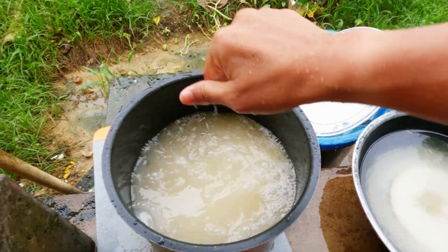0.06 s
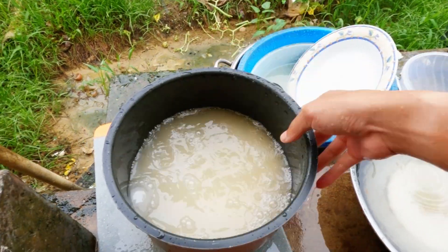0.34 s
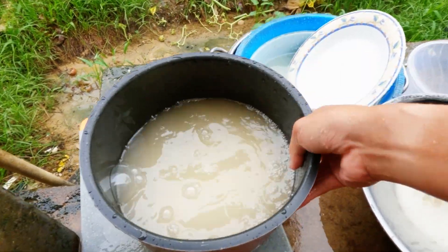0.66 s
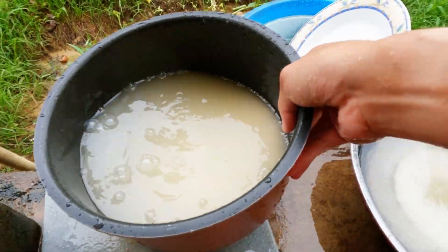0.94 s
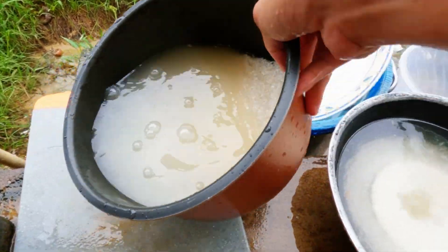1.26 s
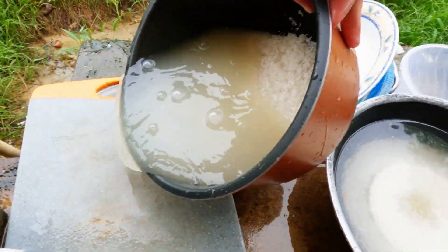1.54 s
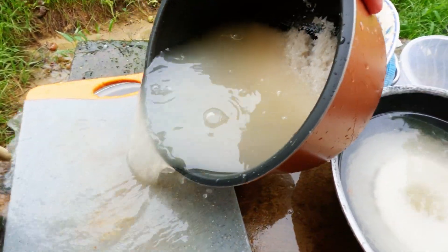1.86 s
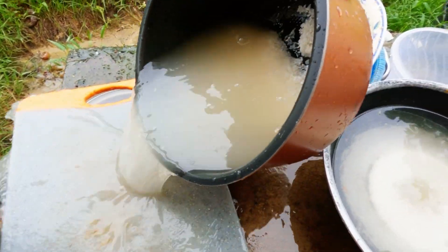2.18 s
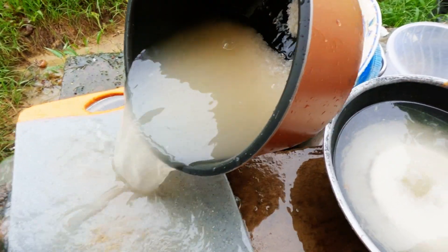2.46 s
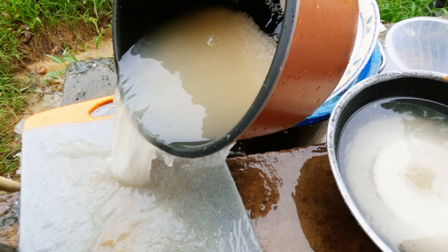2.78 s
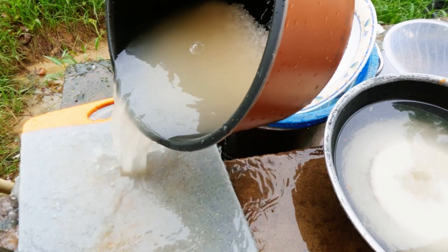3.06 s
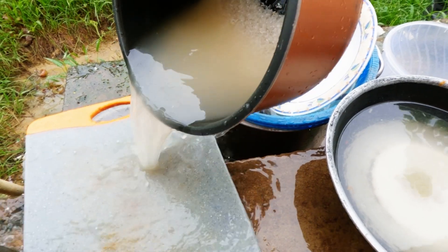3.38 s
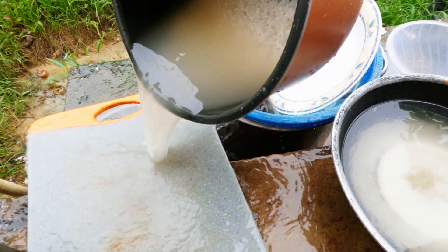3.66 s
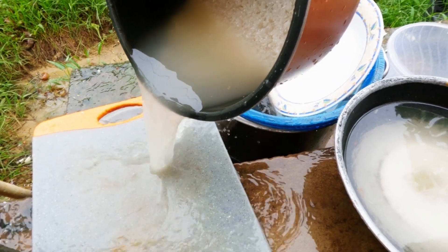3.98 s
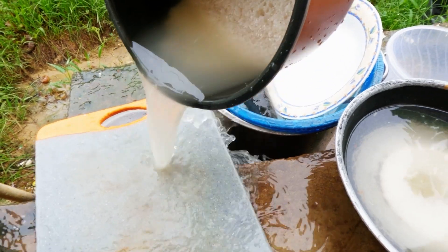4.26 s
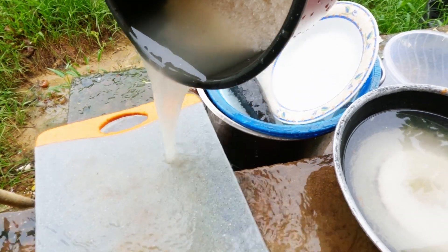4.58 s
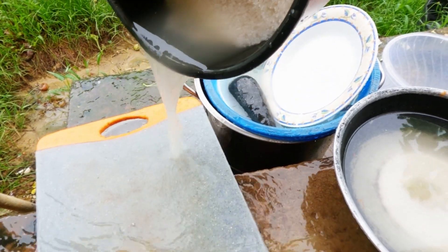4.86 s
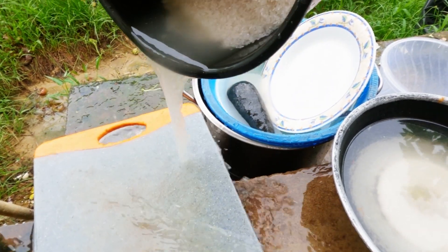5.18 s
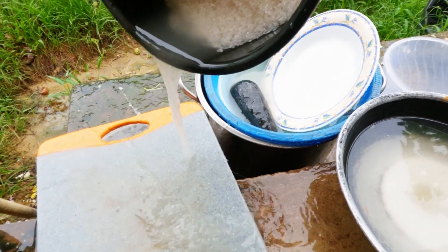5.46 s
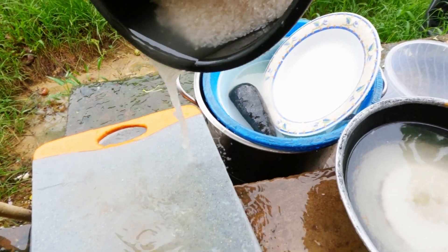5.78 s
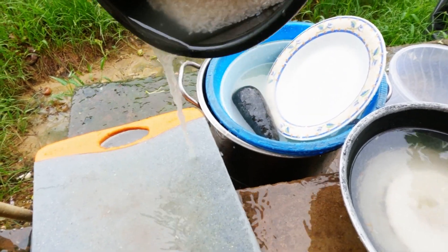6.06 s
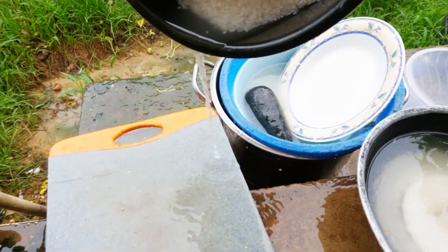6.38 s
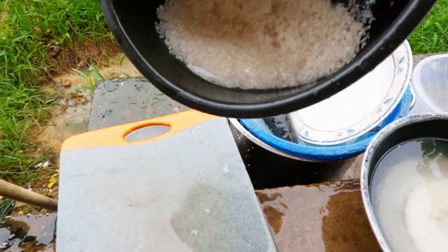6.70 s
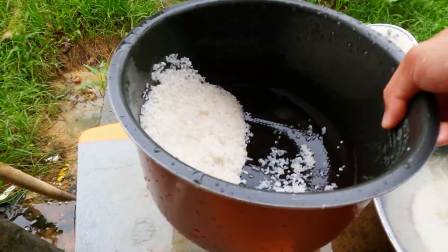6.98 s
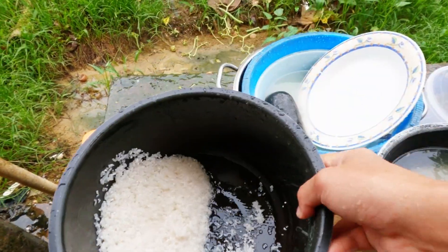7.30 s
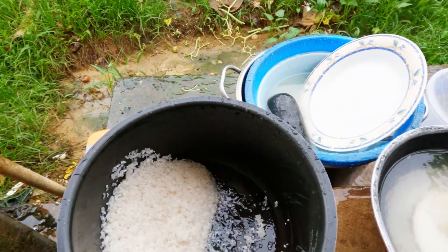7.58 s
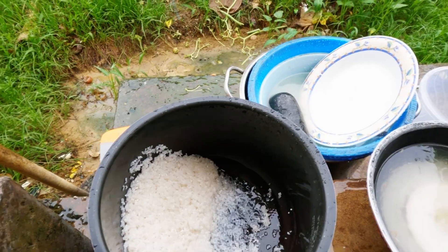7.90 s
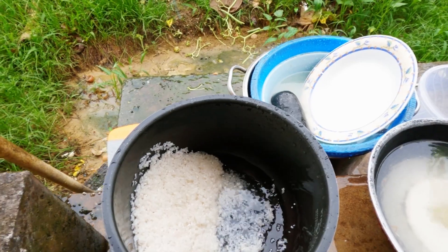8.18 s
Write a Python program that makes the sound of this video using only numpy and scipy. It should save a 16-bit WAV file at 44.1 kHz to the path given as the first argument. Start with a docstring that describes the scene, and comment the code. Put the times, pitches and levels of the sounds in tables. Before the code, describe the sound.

Foam fizzes softly in a pot of rinsed rice, followed by a light tap and a brief breathy rush. Water then pours from the pot and splatters on a plastic board, gurgling into a puddle. The stream thins to a trickle with plinking drops, and the pot is set down with a short ringing knock. The water is close, in a garden with faint trilling insects and a breeze bumping the microphone.

```python
"""Foam fizzes softly in a pot of rinsed rice, while garden insects trill and a breeze bumps the microphone.
The pot taps a plastic board, and a soft breathy rush swells and ends in faint clicks and puffs.
Water sloshes from the tilted pot, splatters on the board, thins to a trickle and plinks into a basin:
each plink is a trapped air bubble ringing. Then the pot is set down with a knock and rings briefly."""
import sys
import numpy as np
from scipy import signal
from scipy.fft import rfft, irfft, next_fast_len
from scipy.io import wavfile
from scipy.ndimage import uniform_filter1d, map_coordinates

SR = 44100
rng = np.random.default_rng(int(sys.argv[2]) if len(sys.argv) > 2 else 0)


def int16_out(signal):
    """Quantize to a 16-bit WAV file."""
    q = np.round(np.clip(np.atleast_2d(signal).T, -1, 1) * 32767)
    wavfile.write(sys.argv[1], SR, q.astype(np.int16))


N = 372204

# water running over the rim: time_s, flow (1 = a full pour)
WATER_FLOW = [(1.8, .04), (2.02, .11), (2.055, .75), (2.16, .55), (2.5, .62), (2.85, 0.99), (3.55, .92),
              (3.78, .45), (4.05, .6), (4.21, .5), (4.27, 1.2), (4.34, .5), (4.5, .66), (4.85, .38),
              (5.35, .28), (5.65, .15), (6.65, .14), (6.95, .08), (7.15, 0.04)]
# how alike left and right sound: pitch_hz, likeness (1 = the same)
EAR_LIKENESS = [(100, 1), (300, 0.9), (2000, 0.53), (4500, 0.88), (8000, 0.63), (13000, 0.72)]


def amp(db):
    """Turn decibels into a gain."""
    return 10 ** (np.asarray(db) / 20)


def unit(x):
    """Scale a signal to an average (rms) size of 1."""
    return x / np.sqrt(np.mean(x ** 2) + 1e-20)


def along(points, hz):
    """Read between (pitch_hz, value) points, on a log scale of pitch."""
    pitches, values = np.transpose(points)
    return np.interp(np.log(hz + 1), np.log(pitches + 1), values)


def curves(rows):
    """One value per sample for each column after the time."""
    times, *columns = np.transpose(rows)
    return [np.interp(np.arange(N) / SR, times, column) for column in columns]


def during(rows):
    """1 from a table's first time to its last, with soft ends."""
    t = np.arange(N) / SR
    return uniform_filter1d(1. * ((t >= rows[0][0]) & (t <= rows[-1][0])), size=1500)


def wobble(rate, size=N):
    """A smooth curve through `rate` random points a second."""
    points = rng.standard_normal(int(size * rate / SR) + 4)
    return unit(map_coordinates(points, [np.arange(size) * rate / SR]))


def filtered(x, response):
    """Scale each frequency in x by response(hz)."""
    size = next_fast_len(N + SR // 2)
    return irfft(rfft(x, size) * response(np.fft.rfftfreq(size, 1 / SR)), size)[..., :N]


def coloured(x, spectrum):
    """Shape the tone by (pitch_hz, level_db) points, keeping sudden starts sharp."""
    size = 4096
    gain = amp(along(spectrum, np.fft.rfftfreq(size, 1 / SR)))
    cepstrum = irfft(np.log(np.maximum(gain, 1e-6)))
    # folding makes the filter ring only after a sound, never before it
    cepstrum[1:size // 2] *= 2
    cepstrum[size // 2 + 1:] = 0
    impulse = irfft(np.exp(rfft(cepstrum)))
    return signal.fftconvolve(np.atleast_2d(x), impulse[None], axes=1)[:, :N]


def resonate(x, hz, width_hz, db):
    """Let x ring in one narrow band of pitch."""
    return filtered(x, lambda f: amp(db) * 1j * f * width_hz / (hz * hz - f * f + 1j * f * width_hz))


def stereo(pair, likeness):
    """Blend two unrelated signals into left and right, as alike as the table says."""
    turn = lambda hz: np.arccos(np.clip(along(likeness, hz), -1, 1)) / 2
    mid, side = filtered(pair, lambda hz: np.array([np.cos(turn(hz)), np.sin(turn(hz))]))
    return np.array([mid + side, mid - side])


def noise(likeness=EAR_LIKENESS):
    """White stereo noise."""
    return stereo(rng.standard_normal((2, N)), likeness)


def pan(db):
    """Two gains that make the left side db louder than the right."""
    return amp(np.array([[.5], [-.5]]) * db)


def add(track, start_s, sound):
    """Mix a sound into a track."""
    start = int(np.clip(round(start_s * SR), 0, N - 1))
    track[..., start:start + sound.shape[-1]] += sound[..., :N - start]


def chance_times(rate):
    """Sample numbers of random events, about `rate` a second."""
    return np.flatnonzero(rng.random(N) < rate / SR)


def scatter(starts, grains, spread):
    """Mix many tiny sounds, each from its own direction."""
    where = (starts[:, None] + np.arange(grains.shape[1])).ravel()
    lean = spread * rng.standard_normal((len(starts), 1))
    return np.array([np.bincount(where, (grains * (1 + side * lean)).ravel(), N)[:N]
                     for side in (1, -1)])


def foam():
    """Starchy foam fizzes away: a flickering hiss that fades."""
    # loudness of the fizz: time_s, level_db
    fade = [(0.0, -53), (0.13, -50.5), (0.428, -55.5), (0.762, -58), (1.2, -58.5), (1.6, -59), (2.0, -72)]
    # tone of the fizz: pitch_hz, level_db
    fizz_tone = [(880, -53), (1500, -31), (2810, -13), (6430, -7), (7080, -7), (8180, -15), (12300, -21),
                 (15000, -46)]
    fizz = unit(coloured(noise() * amp(2.5 * wobble(500)), fizz_tone))
    return during(fade) * amp(curves(fade)[0]) * fizz


def insects(swell_db=1.5):
    """A far chorus trills in the grass; nearer insects repeat falling chirps."""
    # far trills: pitch_hz, width_hz, level_db
    chorus = [(5880, 16, -64), (5990, 32, -65.5), (7420, 170, -63), (9670, 350, -70)]
    # near insects: pitch_hz, fall_hz, level_db, chirps_per_s, offset_s, length_s, roughness (0-1)
    chirpers = [(7840, 150, -68, 15.9, 0.018, 0.035, .4), (7370, 90, -70, 15.6, 0.027, 0.025, .3),
                (6400, 29, -76, 1.607, .91, 0.09, 0.95)]
    out, t = np.zeros((2, N)), np.arange(N) / SR
    for hz, width_hz, db in chorus:
        trill = filtered(noise(), lambda f: 1 / (1 + ((f - hz) / width_hz) ** 2))
        out += amp(db) * unit(trill * amp(swell_db * wobble(14)))
    for hz, fall_hz, db, rate, offset_s, length_s, roughness in chirpers:
        beat = (t - offset_s + 0.0044 * wobble(3.3)) * rate
        progress = np.clip((beat - np.round(beat)) / rate / length_s, -.5, .5)  # 0 in mid-chirp
        phase = 2 * np.pi * np.cumsum(hz - fall_hz * progress + 12 * wobble(4.3)) / SR
        rasp = wobble(300) * np.sin(phase) + wobble(330) * np.cos(phase)
        tone = (1 - roughness) * np.sin(phase) + roughness * rasp
        out += amp(db) * unit(tone * np.cos(np.pi * progress) * amp(swell_db * wobble(3.1)))
    return out


def breeze():
    """Outdoor air hisses and gusts bump the microphone; hard gusts reach higher in pitch."""
    # wind on the microphone: time_s, level_db
    wind = [(0, -72), (.75, -53), (1.55, -78), (1.8, -48.5), (2.2, -41), (3.0, -48), (3.45, -37),
            (3.75, -42), (4.1, -35), (4.6, -46.5), (4.8, -30.5), (5.4, -31), (5.9, -31), (6.3, -35.5),
            (6.7, -28), (7.2, -40.5), (7.65, -47), (7.8, -28.5), (8.1, -47)]
    # sudden gusts: middle_s, length_s, boost_db
    gusts = [(5.36, 0.056, 10.5), (5.529, 0.062, 7), (6.059, 0.1, 13), (6.484, 0.087, 9.5),
             (6.64, 0.083, 7.5), (6.89, 0.063, 10)]
    # how alike the wind is left and right: pitch_hz, likeness (1 = the same)
    likeness = [(30, 0.99), (120, 0.74), (400, 0.25)]
    # tone of the wind's rumble: pitch_hz, level_db
    rumble_tone = [(12, -37), (20, -1.5), (39, 2.5), (66, -2), (151, -17.5), (245, -33), (312, -57),
                   (500, -51.5), (650, -64), (1100, -120)]
    # tone of the outdoor air: pitch_hz, level_db
    air_tone = [(15, -20), (25, -10.5), (90, -4.5), (160, -0.5), (246, -3.5), (349, -18.5), (560, -20),
                (850, -28), (1140, -19.5), (2120, -25.5), (5430, -26), (5800, -37), (6550, -27),
                (7700, -31), (8200, -30), (9810, -38), (11000, -41), (15500, -52)]
    # tone of the flutter in hard gusts: pitch_hz, level_db
    flutter_tone = [(60, -10.5), (150, 13.0), (420, -10), (750, -33.5), (3000, -61)]
    t = np.arange(N) / SR
    gust_db = sum(db * np.exp(-(2 * (t - middle_s) / length_s) ** 2) for middle_s, length_s, db in gusts)
    strength = amp(curves(wind)[0] + gust_db)
    rumble = strength * unit(coloured(noise(likeness) * amp(2.33 * wobble(12)), rumble_tone))
    flutter = unit(coloured(noise(likeness) * amp(0.61 * wobble(27)), flutter_tone))
    flutter *= amp(-11) * strength ** 2 / strength.max()
    air = amp(-50 + 2.2 * wobble(2.7)) * unit(coloured(noise(), air_tone))
    return air + (rumble + flutter) * pan(-3)


def knocks_and_clicks(rattle_db=-9, rattle_fade_s=0.1, crack_db=-15.5, hard_pulse_s=0.00056):
    """Pot knocks and faint clicks: each is a pulse, a ring, a rattle and, if sharp, a crack."""
    # the three rows near 1.6 s are faint clicks and puffs as the breathy rush ends;
    # the rest are the pot knocking on the board: time_s, level_db, pulse_s, ring_db
    pulses = [(.048, -30, 0.00017, -6), (.056, -36, 0.0003, -8), (.067, -35, 0.00025, -8),
              (1.552, -36, 0.00039, -7), (1.612, -41, 0.00018, -6), (1.621, -42, 0.00025, -7),
              (7.3965, -14.5, 0.00058, -26), (7.399, -1.5, 0.00063, -13), (7.4319, -18, 0.00097, -30),
              (7.551, -27, 0.0016, -32), (7.5591, -20.5, 0.00096, -34)]
    # notes the pot rings with: pitch_hz, level_db, fade_s (time to fall 60 dB)
    pot_notes = [(236, 7, 0.05), (333, 9, 0.046), (415, -20, 0.2), (616, 2.5, 0.14), (926, -1, 0.072),
                 (1012, 8.5, 0.045), (1073, 2.5, 0.11), (1270, 0, 0.026), (4130, -6, 0.027)]
    # the base grinding until the pot stands still: time_s, level_db
    settling = [(7.375, -53), (7.388, -30.5), (7.398, -36), (7.408, -39), (7.422, -52), (7.45, -42),
                (7.475, -37), (7.5, -39.5), (7.54, -45), (7.56, -37), (7.585, -48)]
    # tone of the rattling and grinding: pitch_hz, level_db
    rattle_tone = [(50, -23), (110, -1), (300, 1.5), (470, 8), (560, -9.5), (615, 0), (720, -16),
                   (850, -13), (1090, -5), (1400, -18.5), (3000, -33), (9000, -80)]
    out, rattle = np.zeros(N), during(settling) * amp(curves(settling)[0])
    lead_s = .008  # room for the push to build up
    t = np.arange(SR // 2) / SR - lead_s
    after = np.maximum(t, 0)
    for time_s, db, pulse_s, ring_db in pulses:
        push = -t / pulse_s * np.exp((1 - (t / pulse_s) ** 2) / 2)
        hardness = min(1, hard_pulse_s / pulse_s) ** 2
        burst = rng.standard_normal(len(t)) * (t > -.002)
        dulled = uniform_filter1d(uniform_filter1d(burst, size=5), size=4)
        crack = hardness * dulled * amp(crack_db - 60 * t / 0.031)
        ring = sum(amp(level + rng.normal(0, 0.4) - 60 * after / fade_s) * np.sin(2 * np.pi * hz * after)
                   for hz, level, fade_s in pot_notes)
        add(out, time_s - lead_s, amp(db) * (push + crack + amp(ring_db - 12) * ring))
        add(rattle, time_s, amp(db + ring_db + rattle_db - 60 * after / rattle_fade_s))
    return out + rattle * unit(coloured(rng.standard_normal(N), rattle_tone))


def bubble(t, hz, fade_s, rise, attack_s=0.00009):
    """An air bubble rings, falling 60 dB in fade_s; its pitch climbs as it nears the surface."""
    tone = np.sin(2 * np.pi * hz * (t + rise * t * t / 2))
    return tone * amp(-60 * t / fade_s) * (1 - np.exp(-t / attack_s))


def spatter(t, hz, fade_s, attack_s=0.00055):
    """A burst of fine spray: hiss around one pitch, with no bass."""
    f = np.fft.rfftfreq(len(t), 1 / SR)
    hiss = rng.standard_normal(len(t)) + 0.2 * rng.standard_normal((2, len(t)))
    band = (1 + (2 * (f / hz - hz / (f + 1))) ** 2) ** -.7
    bass_cut = 1 + (900 / (f + 1)) ** 8
    treble_cut = 1 + (f / max(8500, hz)) ** 4
    spray = unit(irfft(rfft(hiss) * band / bass_cut / treble_cut, len(t)))
    return spray * amp(-60 * t / fade_s) * (1 - np.exp(-t / attack_s))


def splats(cycles=48, spray_fade_s=0.027):
    """Water slaps something hard: one short, loud bubble and a burst of spray. One row instead gives a short
    puff within the breathy rush."""
    # slaps of water: start_s, level_db, pitch_hz, spray_db; the row at 1.419 s is not water but a short puff
    # within the breathy rush
    slaps = [(0.223, -13, 3100, -10), (0.369, -25, 7000, -23), (0.445, -23.5, 5000, -11),
             (1.419, -30, 2620, 10), (1.572, -36, 11300, -8), (1.785, -40, 12700, -8),
             (1.831, -29.5, 7050, -1), (1.946, -28, 1190, 1), (1.966, -25, 2500, -2),
             (1.976, -12, 3000, -4), (2.061, -16.5, 1800, -2), (2.064, -15, 4670, -7),
             (2.11, -19.5, 5500, 6), (2.306, -16, 1760, -3), (2.328, -15.5, 2900, -4),
             (2.381, -16, 2270, 3), (2.443, -13.5, 3140, -4), (2.545, -8.5, 2940, -1),
             (2.708, -10.5, 2500, 0), (2.823, -13.5, 1565, -14), (2.846, -6.5, 2440, 7),
             (2.862, -10, 2770, -8), (2.95, -4.5, 2560, -40), (2.994, -16.5, 1860, -13),
             (3.033, -12, 2775, 11), (3.072, -7.5, 2470, 3), (3.214, -8.5, 2180, -15),
             (3.26, -8.5, 2160, -3), (3.395, -15, 4680, -9), (3.436, -10, 2310, -9), (3.46, -7.5, 2260, -9),
             (3.47, -11.5, 2020, 2), (3.418, -17, 3930, -4), (3.542, -11, 1950, -10),
             (3.572, -14.5, 2100, -8), (3.623, -12.5, 3590, -12), (3.751, -21, 5130, -10),
             (3.767, -20.5, 2840, -16), (3.896, -19.5, 2600, -5), (3.988, -21, 2840, 4),
             (4.136, -25, 1140, 9), (4.118, -15, 2030, -8), (4.272, -14, 2170, 6),
             (4.427, -16.5, 3550, -9.5), (4.64, -15.5, 1540, 3), (4.707, -18, 5170, -8),
             (4.764, -19, 1683, -4), (5.288, -11, 3510, -9), (5.369, -21, 2700, -10),
             (5.487, -25.5, 4930, -11), (5.721, -24, 4000, -7), (5.737, -24, 2600, -7),
             (5.827, -27, 3400, -3), (5.868, -21.5, 3630, 4), (6.001, -27, 5800, -10),
             (6.144, -16.5, 3470, -5), (6.391, -21.5, 2030, 1), (6.414, -26, 7200, -5),
             (6.542, -16.5, 1730, -5), (7.062, -21.5, 5100, -4), (7.254, -24, 1133, -12),
             (7.534, -35, 3330, -13), (7.747, -31.5, 4230, -12), (7.863, -34, 2750, -1),
             (7.94, -33, 5130, -17), (8.124, -33, 4670, -15), (8.297, -29, 3360, -16),
             (8.403, -32.5, 2260, -5)]
    out, t = np.zeros((2, N)), np.arange(SR // 10) / SR
    for start_s, db, hz, spray_db in slaps:
        ring = bubble(t, hz, cycles / hz, rise=5.3, attack_s=0.59 / hz)
        slap = ring + amp(spray_db) * spatter(t, hz, spray_fade_s)
        add(out, start_s, amp(db - 4) * slap / np.abs(slap).max())
    return out


def breathy_rush(drift_db=1.5, dull_hz=5600):
    """A soft breathy rush with a shifting, vowel-like tone that brightens as it swells."""
    # course of the rush: time_s, level_db, treble_share_db, low_pitch_ratio
    swell = [(0.88, -81, -6, 0.93), (.96, -57, -18, 0.91), (1.03, -51, -12, 0.95), (1.12, -48.5, -11, 1.05),
             (1.2, -50.5, -3.5, 1.13), (1.3, -51, -5.5, 1.1), (1.38, -46.5, -2.5, 1.03),
             (1.45, -41, -2.6, 0.92), (1.53, -45.5, -1.8, 1.03), (1.6, -73, -13, 1)]
    # low vowel-like bands: pitch_hz, width_hz, level_db
    low_bands = [(457, 90, 2), (970, 120, -5.5), (1240, 120, 6), (1740, 82, -4), (2030, 170, -5)]
    # high vowel-like bands: pitch_hz, width_hz, level_db
    high_bands = [(2560, 45, 3.5), (2840, 75, 3), (3540, 220, -4), (3870, 90, -13), (4500, 280, -8.5)]
    db, treble_db, pitch_ratio = curves(swell)
    flicker = amp(1.2 * wobble(230) + 1.6 * wobble(29.95))
    treble = np.clip(amp(treble_db), 0, .9)
    hiss = lambda: rng.standard_normal(N) * flicker * amp(drift_db * wobble(9.37))
    vowel = lambda bands: unit(sum(resonate(hiss(), *band) for band in bands))
    low = map_coordinates(vowel(low_bands), [np.cumsum(pitch_ratio)], order=1)  # bends the pitch
    rush = np.sqrt(1 - treble ** 2) * low + treble * vowel(high_bands)
    return during(swell) * amp(db) * filtered(rush, lambda f: 1 / (1 + (f / dull_hz) ** 6))


def stream(bubble_rate=3000, tick_rate=2800, cycles=24, slosh_hz=2.6, slosh_db=0.75):
    """Lumps of water burst on the board into bubbles and spray, fewer and softer as the flow thins."""
    # tone of the splash: pitch_hz, level_db
    splash_tone = [(240, -36.5), (400, -1.5), (520, -18), (690, -8.5), (830, -16), (974, -2.5), (1360, -7),
                   (2000, 0), (2560, -0.5), (2940, 1), (4200, -1), (7000, -5), (9000, -16), (15600, -61)]
    # tone of the fine spray: pitch_hz, level_db
    spray_tone = [(700, -76), (2500, -12.5), (4000, 4), (5000, -0.5), (6300, -2), (7600, -2.5), (8200, -7),
                  (10000, -10), (12300, -13.5), (15600, -38)]
    flow = np.clip(curves(WATER_FLOW)[0], .01, 1.5)
    lumps = amp(3.5 * (1.18 - .45 * flow) * unit(wobble(45) + .8 * wobble(170)))

    starts = chance_times(bubble_rate * flow * during(WATER_FLOW) * unit(lumps))
    hz = rng.uniform(np.sqrt(480), np.sqrt(8500), (len(starts), 1)) ** 2
    gain = (hz / 1000) ** 0.33 * amp(5 * np.clip(rng.standard_normal(hz.shape), -3, 1.7))
    fade_s = np.minimum(cycles / hz * rng.lognormal(0, 0.81, hz.shape), .02)
    rings = bubble(np.arange(700) / SR, hz, fade_s, rise=22, attack_s=.8 / hz)
    bubbles = scatter(starts, gain * rings, spread=.2)

    hits = rng.random(N) < tick_rate * flow * unit(lumps) / SR
    strength = hits * amp(5 * np.clip(rng.standard_normal(N), -2, 1.5))
    ticks = np.sqrt(np.abs(uniform_filter1d(strength ** 2, size=30))) * rng.standard_normal((2, N))
    mist = amp(-7) * unit(noise() * flow)
    spray = (unit(stereo(ticks, EAR_LIKENESS)) + mist) * amp(3.5 * wobble(140))
    patter = amp(-15) * unit(coloured(spray, splash_tone))
    splash = unit(coloured(bubbles * np.sqrt(lumps), splash_tone)) + patter

    # even out slow swells, so that the flow sets the loudness
    steady = lambda x: x / np.sqrt(np.abs(uniform_filter1d(np.mean(x ** 2, 0), size=7000)) + 1e-4)
    body = amp(-34.5 + 17 * np.log10(flow)) * steady(splash)
    treble = amp(-40 + 14 * np.log10(flow)) * steady(unit(coloured(spray, spray_tone)))
    slosh = np.cos(2 * np.pi * slosh_hz * (np.arange(N) / SR - 2.04))  # water rocks in the tilted pot
    waver_db = 0.22 * wobble(19)  # the stream wavers on the rim
    return during(WATER_FLOW) * amp(slosh_db * slosh + waver_db) * (body + treble)


def plip(t, hz, life_s, climb, tail_db, cycles=18, quiver_db=5.5, fade_db=14):
    """A drop's bubble rings, then its quivering tail sweeps up in pitch and ends at the surface."""
    progress = np.minimum(t / life_s, 1)
    phase = 2 * np.pi * hz * np.cumsum(1 + climb * progress ** 3, axis=-1) / SR
    ring = amp(-60 * t * hz / cycles) * (1 - np.exp(-t * hz / 1.5))
    quiver = wobble(223, size=progress.size).reshape(progress.shape)
    tail = np.sqrt(np.abs(np.sin(np.pi * progress))) * amp(quiver_db * quiver - fade_db * progress)
    return np.sin(phase) * (amp(2) * ring + amp(tail_db) * tail)


def trickle(lowest_hz=950, highest_hz=3600):
    """Water runs off into the puddle and basin, where bubbles plip in uneven clusters."""
    # bubbling of the run-off: time_s, bubbles_per_s, level_db
    bubbling = [(1.8, 53, -44), (2.0, 43.3, -24.5), (2.15, 79, -23), (3.4, 99, -33), (3.8, 56.5, -39.5),
                (4.3, 58.4, -24), (5.7, 48, -37), (6.7, 48.8, -28.5), (7.05, 10.3, -35)]
    rate, db = curves(bubbling)
    clusters = amp(4 * wobble(22))
    starts = chance_times(rate * during(bubbling) * clusters / clusters.mean())
    smallness, steepness = rng.random((len(starts), 2)).T[:, :, None]
    depth, loudness = np.clip(rng.standard_normal((len(starts), 2)), -2, 1.5).T[:, :, None]
    hz = lowest_hz * (highest_hz / lowest_hz) ** smallness
    life_s = 0.02 * np.exp(0.3 * depth)
    plips = plip(np.arange(SR // 16) / SR, hz, life_s, climb=.25 + steepness, tail_db=-11, cycles=13)
    return scatter(starts, amp(db[starts, None] - 4.5 + 4 * loudness) * plips, spread=0.071)


def droplets(per_s=15, middle_hz=3500, cycles=22, level_db=-42):
    """Once the pour begins, stray droplets keep ticking off the board and the pot."""
    starts = chance_times(per_s * (np.arange(N) / SR > WATER_FLOW[0][0]))
    pitch, loudness = np.clip(rng.standard_normal((len(starts), 2)), -2, 2).T[:, :, None]
    hz = middle_hz * np.exp(0.27 * pitch)
    ticks = bubble(np.arange(SR // 30) / SR, hz, cycles / hz, rise=10)
    return scatter(starts, amp(level_db + 8.5 * loudness) * ticks, spread=0.27)


def drips(spray_db=-14, spray_fade_s=0.096):
    """Single drops plop into the water with a little spray, and their bubbles rise."""
    # drops that trap a bubble: start_s, level_db, pitch_hz, life_s, climb (share of the pitch)
    drops = [(2.108, -28, 966, .019, .4), (2.671, -22.5, 1392, 0.03, .4), (2.751, -24, 1004, .036, 0.81),
             (4.352, -27, 1190, 0.019, 0.64), (4.922, -26, 1013, 0.016, 0.2),
             (5.015, -23.5, 1350, .012, 0.47), (5.063, -22.5, 1230, 0.023, 0.37),
             (5.119, -30, 1025, 0.027, 0.47), (5.228, -31, 606, 0.085, 0.68),
             (5.367, -19.5, 2050, 0.0086, 0.57), (5.436, -26, 1238, 0.037, 1.6),
             (5.494, -22, 1013, 0.041, 2.3), (5.547, -27, 1255, .036, 0.73), (5.703, -41, 1101, .024, 1.2),
             (5.775, -32, 1032, 0.052, 0.57), (5.835, -29.5, 1610, .022, 1.5),
             (5.889, -22.5, 1300, .023, .2), (5.944, -25, 1740, .02, 0.84), (6.016, -34, 1750, .018, 1.2),
             (6.061, -23, 1610, .016, 0.89), (6.159, -28.5, 1250, 0.017, 0.45),
             (6.245, -21.5, 1240, 0.0061, .5), (6.282, -26.5, 1113, 0.054, 1.4),
             (6.321, -26, 2630, 0.012, .6), (6.35, -25, 1290, 0.033, 1.6), (6.391, -24, 1025, 0.019, 1.7),
             (6.449, -44.5, 1880, .022, 1), (6.5, -28, 1560, .016, .4), (6.528, -33.5, 581, 0.087, .2),
             (6.544, -33, 1430, 0.038, .5), (6.59, -19, 1750, .013, .4), (6.596, -19, 2480, 0.012, 0.17),
             (6.622, -21.5, 1727, 0.033, 1.06), (6.657, -26, 1030, 0.037, .6),
             (6.686, -36, 2400, 0.018, 0.43), (6.726, -32, 1830, 0.019, 0.82),
             (6.761, -20, 1336, 0.03, 2.1), (6.811, -29.5, 894, 0.038, 1.6), (6.827, -22, 1853, 0.01, .3),
             (6.861, -26, 1780, 0.013, .2), (6.907, -28.5, 1604, .018, 0.17),
             (6.975, -32, 1630, 0.017, 0.27), (6.989, -25.5, 1940, 0.016, .1),
             (7.163, -38, 1040, 0.055, 0.19), (7.252, -25.5, 1127, 0.065, .7), (7.725, -28, 910, .07, 0.78),
             (8.095, -36, 1445, 0.016, 0.35)]
    out, t = np.zeros((2, N)), np.arange(SR // 6) / SR
    for start_s, db, hz, life_s, climb in drops:
        plop = plip(t, hz, life_s, climb, tail_db=-10)
        spray = amp(spray_db) * spatter(t, hz, spray_fade_s)
        add(out, start_s, amp(db - 1.5) * (plop + spray))
    return out


def gurgles(count=20, cycles=26):
    """Each gulp of water plunges into the puddle and churns up a crowd of rising bubbles."""
    # gulps: start_s, length_s, bubble_level_db, middle_pitch_hz
    gulps = [(2.192, 0.076, -31, 2270), (2.373, 0.065, -35, 2300), (2.549, 0.053, -25, 2420),
             (2.843, .03, -27.5, 1340), (3.398, 0.027, -25, 4040), (3.451, 0.034, -28, 2160),
             (3.533, 0.063, -22, 1920), (3.616, 0.018, -20, 3370), (3.643, .05, -31, 2800),
             (4.065, 0.075, -29, 1822), (4.241, 0.074, -28, 2400), (4.453, 0.052, -30, 2400)]
    out, t = np.zeros((2, N)), np.arange(SR // 30) / SR
    for start_s, length_s, db, middle_hz in gulps:
        starts = (SR * (start_s + length_s * (np.arange(count) + rng.random(count)) / count)).astype(int)
        pitch, loudness = np.clip(rng.standard_normal((count, 2)), -2, 2).T[:, :, None]
        hz = middle_hz * np.exp(0.241 * pitch)
        bubbles = bubble(t, hz, cycles / hz, rise=18, attack_s=1 / hz)
        out += scatter(starts, amp(db + 3 * loudness) * bubbles, spread=0.14)
    return out


def garden_echo(x, fade_s=0.14):
    """Sound bounces off the pot, basin and ground as a short echo."""
    t = np.arange(SR // 5) / SR
    tail = rng.standard_normal((2, len(t))) * amp(-60 * t / fade_s) * (t > .002)
    return signal.fftconvolve(x, tail / np.linalg.norm(tail[0]), axes=1)[:, :N]


def scene():
    """Water and pot close by, the garden around them."""
    drops = splats() + gurgles() + drips() + trickle() + droplets()
    pour = stream()
    echo = garden_echo(amp(-12) * drops + amp(-6) * pour)
    close_by = (pour + drops + echo + foam() + breathy_rush()) * pan(1.2)
    return close_by + knocks_and_clicks() + insects() + breeze()


def record(dry, top_hz=15800):
    """Sound reaches the microphone's right side slightly first; nothing above top_hz is kept."""
    # how far the left side lags: pitch_hz, lag_radians
    left_lag = [(100, 0.1), (500, 0.4), (2000, 0.4), (3200, 0.69), (6500, 0.31), (12000, 0)]
    return filtered(dry, lambda hz: (hz < top_hz) * np.exp(np.outer([-.5, .5], 1j * along(left_lag, hz))))


dry = scene()
out = record(dry)
int16_out(out)
```